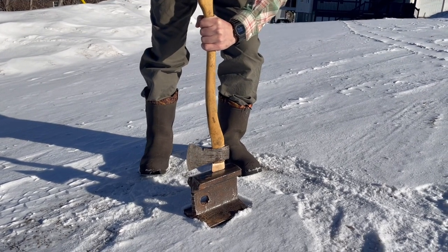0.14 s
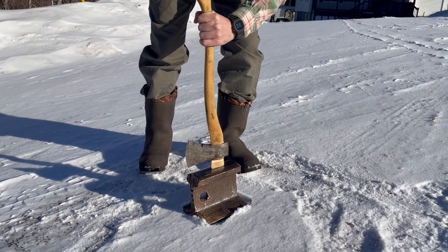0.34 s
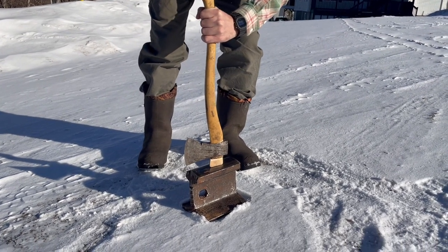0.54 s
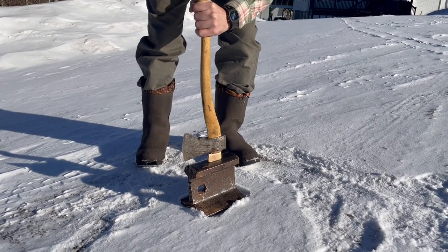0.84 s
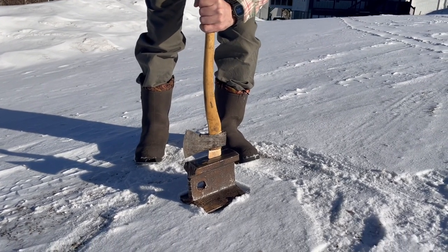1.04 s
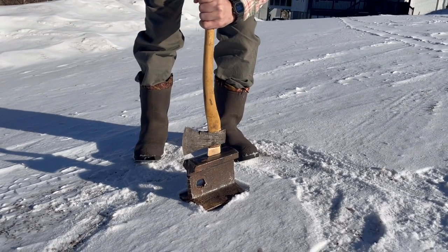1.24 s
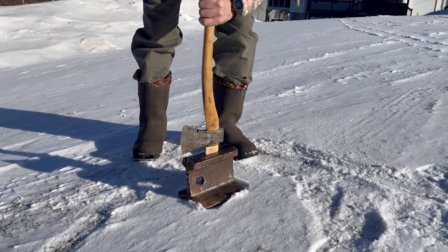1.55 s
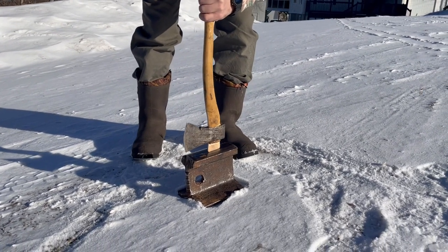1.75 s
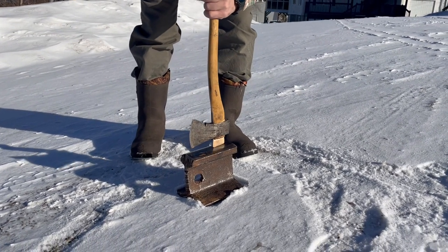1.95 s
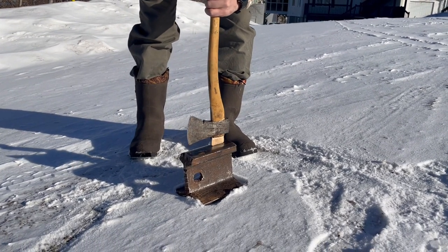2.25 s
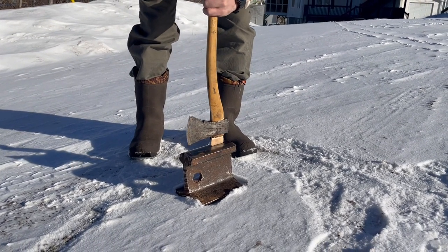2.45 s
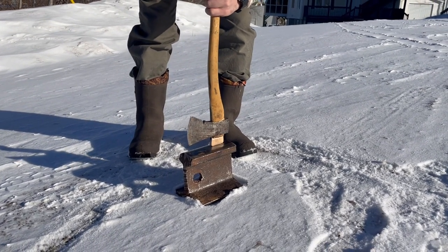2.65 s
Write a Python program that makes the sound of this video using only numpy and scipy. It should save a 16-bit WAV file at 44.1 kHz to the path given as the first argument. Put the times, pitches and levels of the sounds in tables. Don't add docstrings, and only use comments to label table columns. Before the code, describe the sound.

An axe is knocked handle end down on a steel rail lying in snow, a few metres away. Sharp, chattering cracks at 0.43 and 1.33 s carry a short falling wooden thud, faint steel ring, tiny bounces and weak late echo. Gusty wind rumbles and buffets from 0.2 s, popping hard near 0.9, 1.2, 1.75-1.9 and 2.2-2.4 s, dipping briefly after each blow and fading by 2.7 s over thin hiss.

```python
import sys
import numpy as np
from scipy import signal
from scipy.fft import rfft, irfft
from scipy.io import wavfile
from scipy.ndimage import uniform_filter1d

SR = 44100
rng = np.random.default_rng(int(sys.argv[2]) if len(sys.argv) > 2 else 0)


def to_linear_factor(level_db):
    exponent = np.asarray(level_db, float) / 20
    return 10 ** exponent


def transcribe(signal):
    frames = np.atleast_2d(signal).T
    limited = np.clip(frames, -1, 1)
    pcm = np.round(limited * 32767).astype(np.int16)
    wavfile.write(sys.argv[1], SR, pcm)


N = 123479

# (time [s], crack level [dB], thud level [dB])
BLOWS = [
    (.4340, -10.5, -4),
    (1.3337, -10.5, -5),
]
PORT_LAG_S = .00026


def evened(x):
    return x / np.sqrt(np.mean(x ** 2) + 1e-20)


def read(points, hz):
    f, value = np.transpose(points)
    return np.interp(np.log(hz + 1), np.log(f + 1), value)


def add(mix, s, sound):
    part = mix[..., max(round(s * SR), 0):][..., :sound.shape[-1]]
    part += sound[..., :part.shape[-1]]


def colour(x, points):
    gain = to_linear_factor(read(points, np.fft.rfftfreq(x.shape[-1], 1 / SR)))
    return irfft(rfft(x) * gain, x.shape[-1])


def resonate(x, hz, width):
    r = np.exp(-np.pi * width / SR)
    return 2 * signal.lfilter([1 - r], [1, -r * np.exp(2j * np.pi * hz / SR)], x).real


def resonate_twice(x, hz, width):
    return resonate(resonate(x, hz, width), hz, width)


def crack(peaks, t):
    contact_s, rattle_t60, rattle_db = .0029, .03, -9.5
    late, head = np.maximum(t - contact_s, 0), round(contact_s * SR)
    gate = np.minimum(t / .0003, 1) * np.exp(-late / .0004)
    out = 0
    for hz, width, db in peaks:
        noise = rng.standard_normal(len(t) + 500)
        band = resonate(resonate(noise, hz, width), hz, 2 * width)[500:]
        band = band / np.sqrt(np.mean(band[:head] ** 2))
        rattle = to_linear_factor(rattle_db - 60 * late / rattle_t60 * max(hz, 2600) / 3000)
        out = out + to_linear_factor(db) * band * (gate + rattle * (t > .001))
    return out


def thud(level_db, t):
    delay_s, t60, hold_s = .0027, .04, .0066
    top_hz, end_hz, fall_s = 900, 290, .0013
    push_db, push_hz = -14.5, 171
    u = np.maximum(t - delay_s, 0)
    hz = end_hz + (top_hz - end_hz) * np.exp(-u / fall_s)
    fade = to_linear_factor(-60 * u / t60)
    shape = .85 * np.exp(-(u / hold_s) ** 3) + .15 * fade
    tone = np.sin(2 * np.pi * np.cumsum(hz * (u > 0)) / SR) * shape
    push = to_linear_factor(push_db) * np.sin(2 * np.pi * push_hz * u) * fade
    return to_linear_factor(level_db) * tone + push


def ring(modes, t):
    out = 0
    for hz, db, t60 in modes:
        rough = evened(resonate_twice(rng.standard_normal(len(t)), hz, 150))
        out = out + to_linear_factor(db - 60 * t / t60) * evened(np.sin(2 * np.pi * hz * t) + 0.65 * rough)
    return out


def blows():
    # (frequency [Hz], width [Hz], level [dB])
    crack_peaks = [
        [(1325, 520, -3), (2070, 500, -1.5), (3480, 310, -1), (5010, 900, -10.5), (6220, 400, -17),
         (7180, 990, -7), (9900, 1200, -11), (11940, 360, -17), (13700, 1200, -20.5)],
        [(1274, 61, 1), (2300, 450, 2.5), (2980, 400, -7.5), (4170, 400, -5.5), (6560, 700, -6),
         (10390, 450, -7), (12000, 150, -15.5), (13580, 180, -13), (14800, 2000, -24)],
    ]
    # (frequency [Hz], level [dB], decay t60 [s])
    ring_modes = [
        [(2050, -31, 0.06), (3952, -43.5, 0.057), (6300, -52, 0.21), (9975, -55.5, .1), (10330, -53, 0.1),
         (10800, -46, .13), (12100, -52, .08)],
        [(2560, -37, .03), (4050, -47.5, .1), (5500, -48, 0.12), (7200, -58.5, 0.25), (9975, -57, 0.24),
         (10600, -46, 0.14), (12000, -49, .14)],
    ]
    out, t = np.zeros(N), np.arange(SR // 3) / SR
    for (s, crack_db, thud_db), peaks, modes in zip(BLOWS, crack_peaks, ring_modes):
        add(out, s, to_linear_factor(crack_db - 6) * crack(peaks, t) + thud(thud_db, t) + ring(modes, t))
    return out


def ticks():
    # (time [s], peak level [dB], frequency [Hz], length [s])
    bounces = [(.2628, -50.5, 2200, 0.0022), (.3346, -50, 3660, 0.0069), (.3556, -39.5, 2640, 0.012),
               (.4643, -23, 2086, 0.00042), (.4644, -25.5, 2170, 0.00056), (.4646, -32.5, 3025, .0008),
               (.4722, -30.5, 2000, .0012), (.4783, -40, 2300, 0.0018), (.4785, -38.5, 3700, .002),
               (.9068, -49.5, 2500, 0.0024), (1.1888, -50, 3800, 0.0032), (1.3598, -28.5, 3316, .006),
               (1.3605, -30, 662, 0.0013), (1.3625, -25, 2380, 0.001), (1.364, -44.5, 6100, 0.0028),
               (1.3675, -45, 4200, .002), (1.4301, -49.5, 3000, .002), (1.482, -47, 2180, 0.0055),
               (1.7472, -45, 2500, 0.0017), (1.7562, -46, 2500, 0.0014), (1.765, -48, 4050, 0.003),
               (1.8335, -51, 3200, 0.002), (1.8532, -46.5, 2870, 0.00092), (2.172, -54, 1900, 0.0033),
               (2.214, -49, 1634, 0.0016), (2.297, -55.5, 1740, 0.0014), (2.4633, -41.5, 1380, 0.0075),
               (2.4635, -54.5, 1950, .006)]
    out, t = np.zeros(N), np.arange(1500) / SR
    for s, db, hz, length in bounces:
        burst = rng.standard_normal(1500) * np.exp(-t / max(length, 2e-4) * 2) * np.minimum(t / 0.00026, 1)
        width = .07 * hz * length / 0.0013
        tick = resonate(resonate(burst, hz, width), hz, hz)
        tick = tick + to_linear_factor(-40) * resonate_twice(burst, 1.6 * hz, hz)
        add(out, s, to_linear_factor(db) * tick / abs(tick).max())
    return out


def at_ports(direct):
    # (frequency [Hz], level [dB])
    blow_pan = [(60, -2), (150, 0), (380, 0.5), (950, 6), (2380, 3.5), (5980, 7), (15000, -1.5)]
    # (frequency [Hz], phase [rad])
    blow_turn = [(0, -1), (5170, 1.22), (5940, -0.5), (11100, -5.5), (13500, -7.5), (15700, -7.5),
                 (16500, -9.5)]
    hz = np.fft.rfftfreq(N, 1 / SR)
    half = np.array([[.5], [-.5]])
    tilt = to_linear_factor(half * read(blow_pan, hz)) * np.exp(1j * half * read(blow_turn, hz))
    return irfft(rfft(direct) * tilt, N)


def echo():
    # (frequency [Hz], level [dB])
    echo_tone = [(300, -4), (1500, 2), (3500, 1), (7000, -10), (8400, -44), (10500, -11.5), (12500, -15.5),
                 (13600, -59.5)]
    near_db, near_t60 = -46, 0.28
    far_s, far_db, far_t60 = 0.13, -59, 0.94
    t = np.arange(SR // 2) / SR
    near = to_linear_factor(near_db - 60 * t / near_t60) * np.minimum(t / 0.0044, 1)
    far = to_linear_factor(far_db - 60 * (t - far_s) / far_t60) * np.clip((t - far_s) / 0.029, 0, 1)
    flicker = to_linear_factor(0.83 * evened(uniform_filter1d(rng.standard_normal(len(t)), size=300)))
    n = rng.standard_normal((3, len(t)))
    pair = n[0] + 0.7 * n[1:]
    return evened(colour(pair, echo_tone)) * (near + far) * flicker


def echoes():
    out = np.zeros((2, N))
    for s, _, _ in BLOWS:
        add(out, s, echo())
    return out


def pops():
    # (time [s], peak level [dB], starting frequency [Hz], length [s])
    pop_events = [(0.2612, -13.5, 740, 0.012), (0.514, -22, 700, 0.006), (.5505, -16.5, 742, 0.0053),
                  (0.9032, -9.5, 700, 0.022), (0.984, -13.5, 797, 0.0046), (1.1733, -6.5, 490, 0.01),
                  (1.188, -6.5, 1240, 0.0066), (1.41, -24, 650, 0.0056), (1.432, -18.5, 712, 0.0057),
                  (1.7467, -6.5, 1336, 0.0045), (1.7667, -12.5, 900, 0.016), (1.816, -32.5, 704, .008),
                  (1.8318, -7.5, 1064, 0.0042), (1.8555, -1.5, 1510, 0.0017), (2.1713, -9, 743, 0.0081),
                  (2.1754, -14.5, 519, 0.006), (2.432, -22.5, 697, .006), (2.284, -13.5, 991, 0.0048),
                  (2.381, -23, 915, 0.016), (2.393, -16.5, 920, 0.015), (2.4027, -22, 709, 0.011)]
    stretch, rise_turns = 0.5, 0.89
    out, t = np.zeros((2, N)), np.arange(4000) / SR
    u = np.maximum(t - PORT_LAG_S * np.array([[1], [0]]), 0)
    for s, db, top_hz, length in pop_events:
        turns = np.log(1 + stretch * top_hz * u) / stretch
        shape = (1 - np.exp(-(turns / rise_turns) ** 2)) * np.exp(-(u / length) ** 2)
        add(out, s - .0003, to_linear_factor(db) * shape * np.cos(2 * np.pi * turns))
    return out


def gusts():
    # (start time [s], length [s], level [dB], top frequency [Hz])
    tears = [
        (1.757, .01, -15, 1064),
        (1.772, 0.037, -21.5, 593),
        (1.828, 0.0038, -21, 800),
        (1.839, 0.0093, -12, 972),
        (1.853, 0.016, -20, 750),
        (1.872, 0.01, -23, 820),
        (2.363, .011, -24.5, 956),
        (0.902, 0.029, -26.5, 590),
        (1.06, .07, -31.5, 650),
    ]
    out = np.zeros((2, N))
    for s, length, db, top_hz in tears:
        n = signal.lfilter([1], [1, -.97], rng.standard_normal((3, 8000)))
        both = np.array([np.roll(n[0], round(PORT_LAG_S * SR)), n[0]]) + 0.28 * n[1:]
        sos = signal.butter(4, [top_hz * 0.24, top_hz], "band", fs=SR, output="sos")
        shape = np.sin(np.pi * np.minimum(np.arange(7000) / SR / (1.7 * length), 1) ** .7) ** 2
        swell = signal.sosfilt(sos, both)[:, 1000:] * shape
        add(out, s - .002, to_linear_factor(db + 8) * swell / abs(swell).max())
    return out


def eddies(rows, cycles):
    glide, roughness, pan_db = 1.28, .3, 3
    out = np.zeros((2, N))
    for s, db, hz in rows:
        start_turn, pan = rng.uniform(-1.0, 1, 2)
        x = np.minimum(np.arange(5000) / SR * hz / cycles, 1)
        phase = 2 * np.pi * np.cumsum(hz * glide ** (1 - 2 * x)) / SR
        sweep = np.sin(phase + np.pi * start_turn)
        noise = rng.standard_normal((2, 5000))
        rough = evened(resonate_twice(resonate_twice(noise, hz, hz), hz, hz))
        shape = np.sin(np.pi * x ** 0.91) ** 2
        level = to_linear_factor(db + pan_db * pan * np.array([[.5], [-.5]]))
        add(out, s - .15 / hz, level * shape * (sweep + roughness * rough))
    return out


def fast_eddies():
    # (time [s], peak level [dB], frequency [Hz])
    flutters = [(0.2, -19.5, 278), (.225, -25, 300), (0.287, -9, 337), (0.331, -15, 237),
                (0.373, -18.5, 311), (0.514, -21, 271), (.633, -27, 370), (.731, -33.5, 347),
                (.818, -24.5, 336), (.959, -27.5, 358), (1.059, -26.5, 339), (1.081, -23, 248),
                (1.148, -18, 300), (1.264, -21, 276), (1.409, -27, 300), (1.673, -30, 252.5),
                (1.722, -26.5, 372), (2.054, -38.5, 425), (2.07, -29, 253), (2.108, -30, 318),
                (2.144, -30, 404), (2.432, -28.5, 377), (2.559, -26, 366), (2.632, -29, 300)]
    return eddies(flutters, cycles=2.82)


def slow_buffets():
    # (time [s], peak level [dB], frequency [Hz])
    thumps = [
        (.229, -9, 99.4),
        (.375, -12.5, 99),
        (.603, -9.5, 82),
        (.905, -9, 87.2),
        (1.161, -17, 88.2),
        (1.742, -17, 159.6),
        (1.87, -20.5, 73.2),
        (2.158, -18.5, 77.7),
        (2.39, -16.5, 77.3),
        (2.55, -22, 90),
    ]
    return eddies(thumps, cycles=2.66)


def gust(column):
    # (time [s], pressure level [dB], speed as stretch of the spectrum [ratio])
    wind_course = np.array([(0, -43.5, 0.72), (.11, -30.5, 0.73), (.17, -34, 0.77), (0.229, -15.5, 1.12),
                            (.41, -25.5, 1), (.62, -20, 0.98), (.86, -23.5, 1.075), (1.169, -25, 1.4),
                            (1.36, -31, 1), (1.451, -29, 1.3), (1.489, -42.5, 0.68), (1.66, -40, .9),
                            (1.75, -20.5, 1.5), (1.89, -26, 1.255), (2.032, -33, 0.72), (2.42, -23, 1.2),
                            (2.65, -28.5, 0.9), (2.7, -37, 0.57)])
    return np.interp(np.arange(N) / SR, wind_course[:, 0], wind_course[:, column])


def ports(tone, apart, turn, patch_db, stretch, size):
    hz = np.fft.rfftfreq(size, 1 / SR)
    a, b, c, d, p = rng.standard_normal((4 * N // size + 12, len(hz), 5)).T
    patches = evened(uniform_filter1d(uniform_filter1d(p, size=5, axis=0), size=5, axis=1))
    mid = a + 1j * b
    side = apart * (c + 1j * d) + 1j * turn * mid
    at = np.clip(np.arange(a.shape[1]) * size // 4 - size, 0, N - 1)
    gain = to_linear_factor(read(tone, hz[:, None] / stretch[at]) + patch_db * patches)
    z = np.array([mid + side, mid - side]) * gain
    return evened(signal.istft(z, nperseg=size, noverlap=3 * size // 4)[1][:, size:N + size])


def wind():
    # (frequency [Hz], level [dB])
    wind_tone = [(15, -37), (25, -13), (70, 5), (146, -3.5), (213, -6.5), (253, -10), (460, -27),
                 (913, -51), (1500, -62), (1950, -77), (3300, -120)]
    wind_tone = wind_tone + [(2500, -100)]
    flurry = signal.butter(2, [8, 40], "band", fs=SR, output="sos")
    lumps = evened(signal.sosfiltfilt(flurry, rng.standard_normal(3 * N))[N:2 * N])
    lumps = np.clip(lumps, -2, 2)
    speed = np.clip(gust(column=2), .3, 4) * to_linear_factor(0.91 * lumps)
    rumble = ports(wind_tone, apart=.15, turn=.2, patch_db=3, stretch=speed, size=1024)
    return rumble * to_linear_factor(gust(column=1) + 3 * lumps - 0.5)


def ducking():
    depth_db, hold_s, back_s = -20, 0.046, 0.024
    t, duck_db = np.arange(N) / SR, np.zeros(N)
    for s, _, _ in BLOWS:
        drop = np.clip((t - s) / 0.007, 0, 1)
        recovery = np.clip(1 - (t - s - hold_s) / back_s, 0, 1)
        duck_db += depth_db * drop * recovery
    return to_linear_factor(duck_db)


def rustles():
    # (start time [s], length [s], level [dB])
    rubs = [
        (1.778, .065, -72.5),
        (1.871, 0.031, -75),
    ]
    out = np.zeros((2, N))
    for s, length, db in rubs:
        n = rng.standard_normal((2, 4000))
        crackle = to_linear_factor(4.5 * evened(uniform_filter1d(rng.standard_normal(4000), size=120)))
        n = n * crackle * (np.arange(4000) < length * SR)
        bands = sum(resonate_twice(n, hz, 450) for hz in (6700, 10100))
        add(out, s, to_linear_factor(db) * evened(bands))
    return out


def air():
    # (frequency [Hz], level [dB])
    air_tone = [(120, -33), (334, -0.5), (1740, -16.5), (7300, -43.5), (7700, -77), (8900, -75),
                (9200, -43), (12400, -42), (13400, -47), (13900, -79)]
    air_tone = [(100, -42.0)] + air_tone
    # (time [s], level [dB])
    air_swell = [(0, -0.5), (0.351, 1.5), (.75, -1), (.95, -2), (1.249, 1), (1.75, 1), (2.0, -3),
                 (2.449, -0.5), (2.8, 3.5)]
    air_db, air_follow = -59, 0.035
    whine_hz, whine_db, whine_follow = 11900, -90, .9
    pressure_db = gust(column=1)
    swell_db = np.interp(np.arange(N) / SR, *np.transpose(air_swell))
    hiss = ports(air_tone, apart=1, turn=0, patch_db=0.64, stretch=np.ones(N), size=512)
    hiss = hiss * to_linear_factor(air_db + 5.5 + air_follow * (pressure_db + 43.0) + swell_db)
    whine = evened(resonate_twice(rng.standard_normal((2, N)), whine_hz, 300))
    return hiss + whine * to_linear_factor(whine_db + whine_follow * (pressure_db + 25))


def scene():
    struck = at_ports(blows() + ticks()) + echoes()
    ducked = ducking() * (slow_buffets() + wind())
    return struck + pops() + gusts() + fast_eddies() + ducked + rustles() + air()


def band_limit(x):
    return signal.sosfilt(signal.butter(12, 16850, fs=SR, output="sos"), x)


def record(dry):
    x = signal.sosfilt(signal.butter(2, 40, "high", fs=SR, output="sos"), dry)
    x = signal.sosfilt(signal.butter(8, 15700, fs=SR, output="sos"), x)
    return band_limit(np.clip(x, -1, 1))


dry = scene()
out = record(dry)
transcribe(out)
```